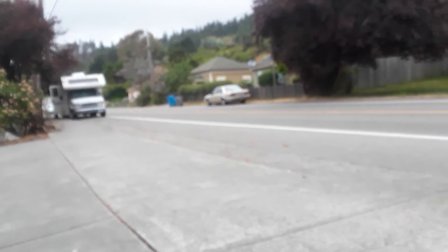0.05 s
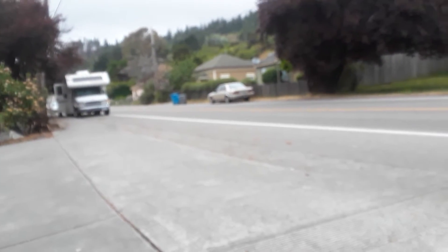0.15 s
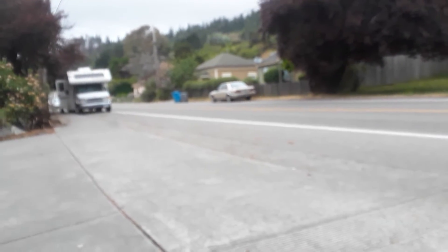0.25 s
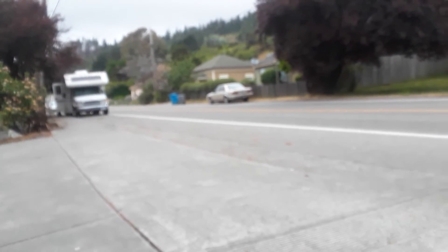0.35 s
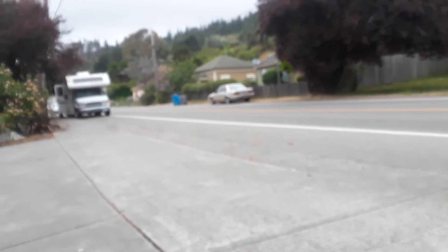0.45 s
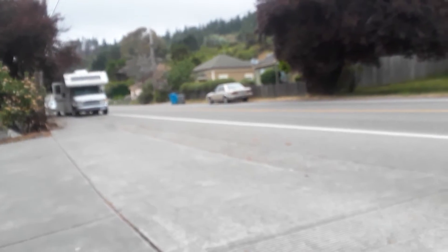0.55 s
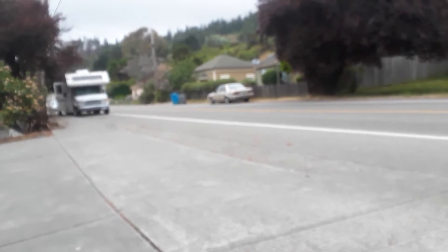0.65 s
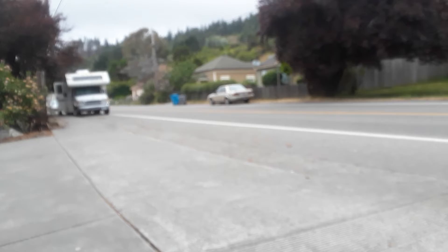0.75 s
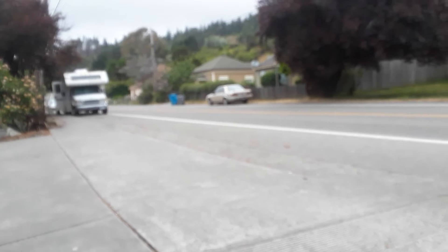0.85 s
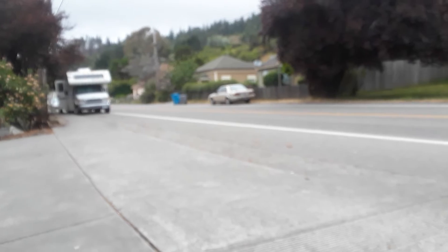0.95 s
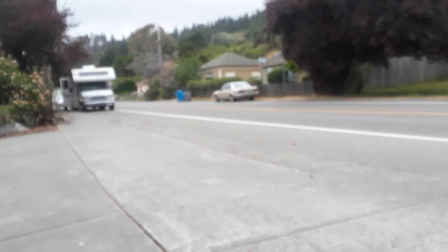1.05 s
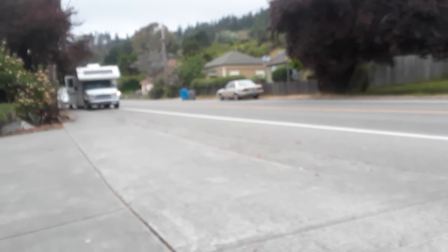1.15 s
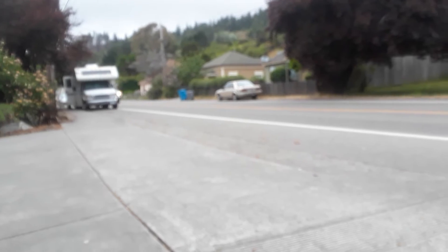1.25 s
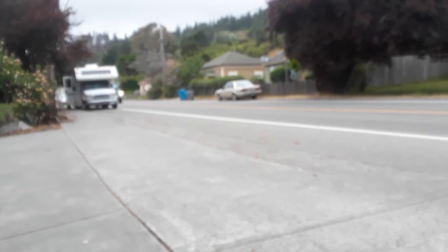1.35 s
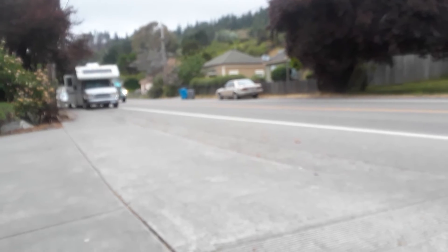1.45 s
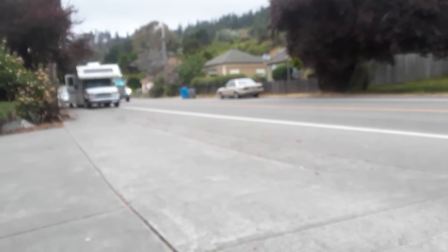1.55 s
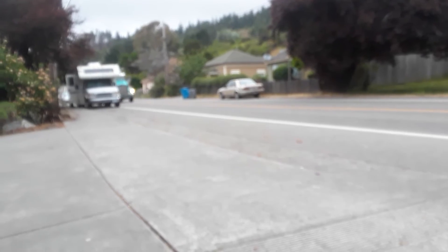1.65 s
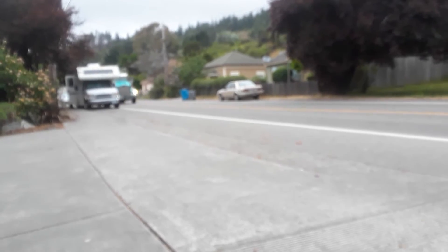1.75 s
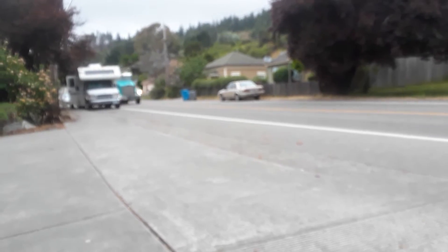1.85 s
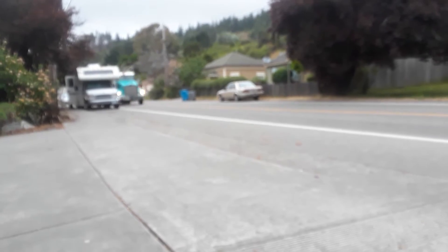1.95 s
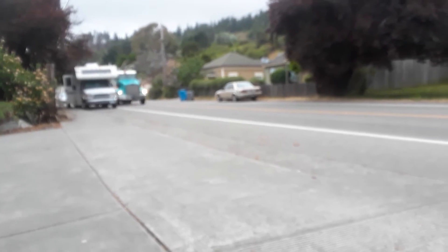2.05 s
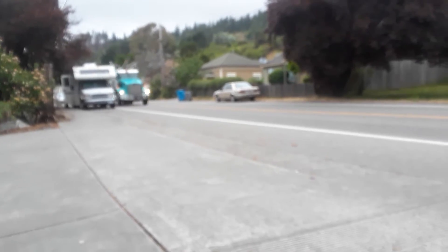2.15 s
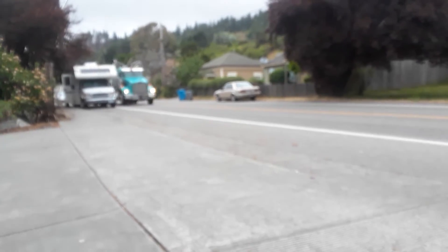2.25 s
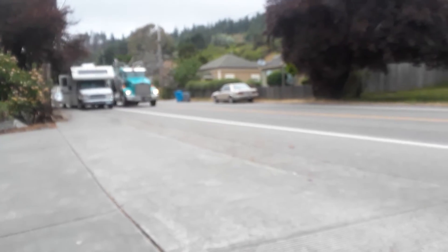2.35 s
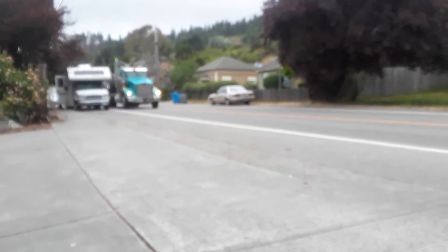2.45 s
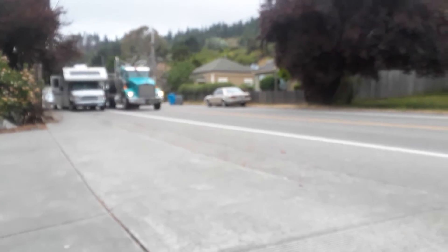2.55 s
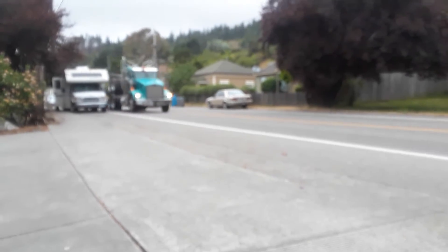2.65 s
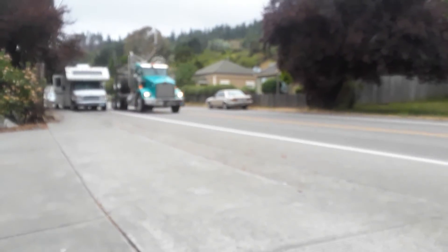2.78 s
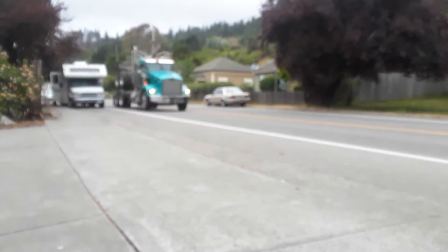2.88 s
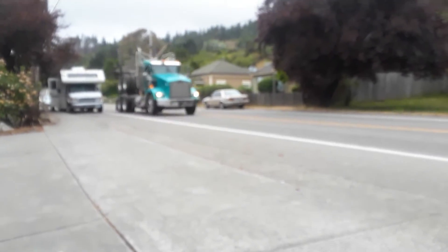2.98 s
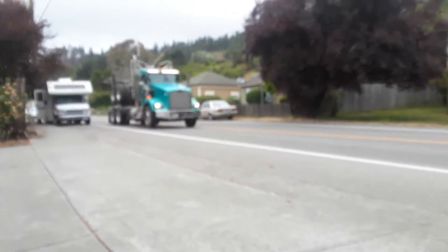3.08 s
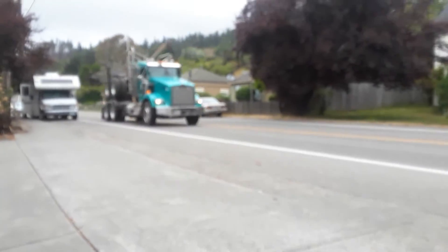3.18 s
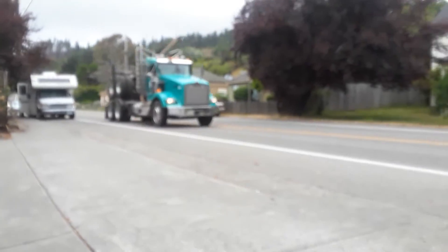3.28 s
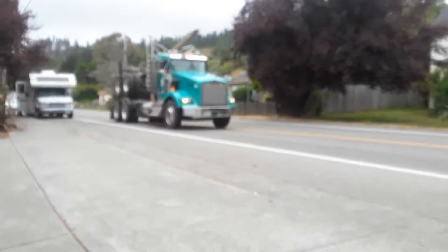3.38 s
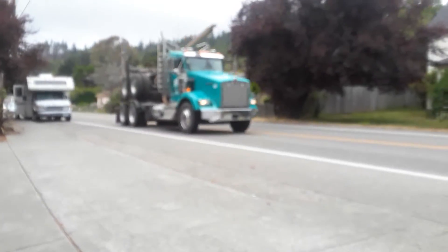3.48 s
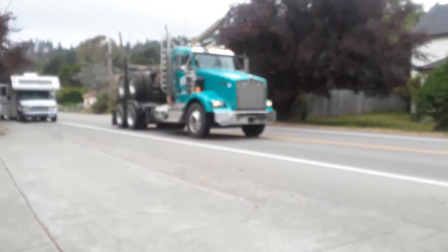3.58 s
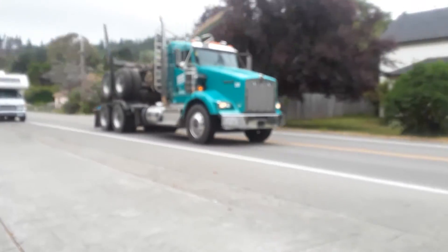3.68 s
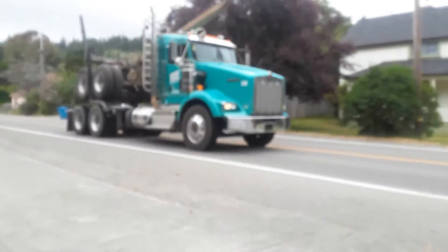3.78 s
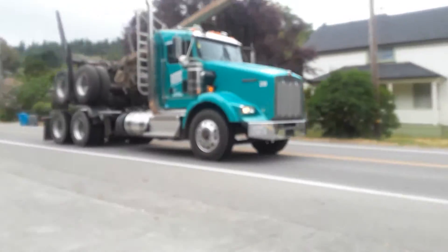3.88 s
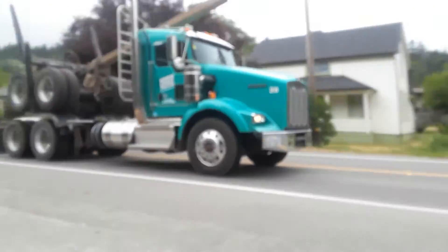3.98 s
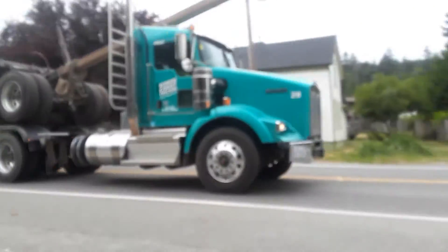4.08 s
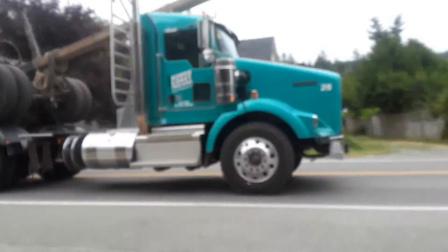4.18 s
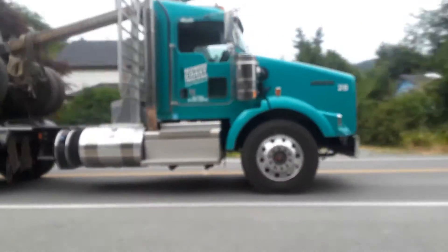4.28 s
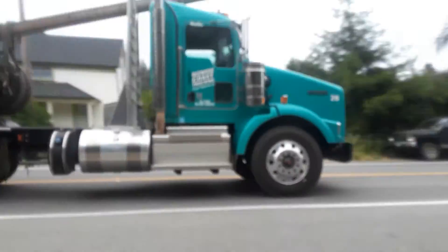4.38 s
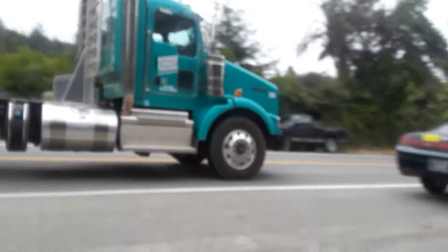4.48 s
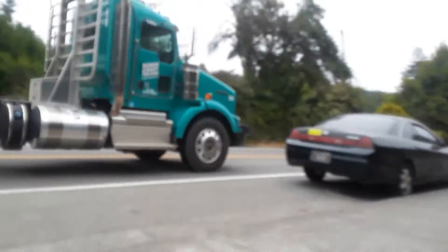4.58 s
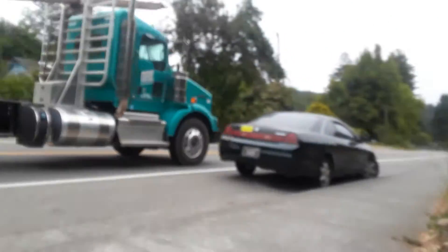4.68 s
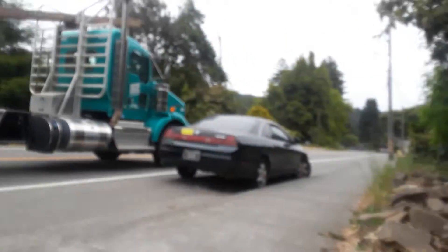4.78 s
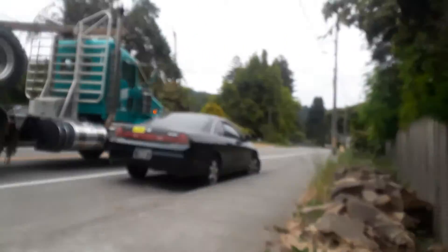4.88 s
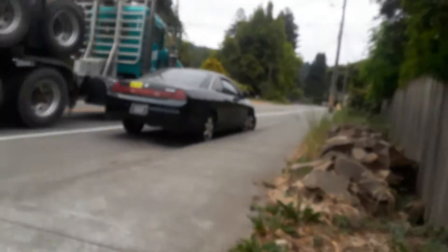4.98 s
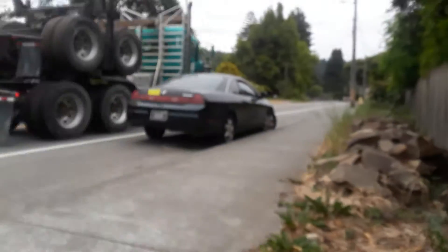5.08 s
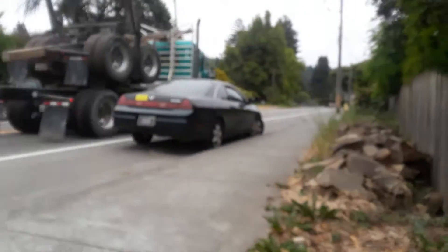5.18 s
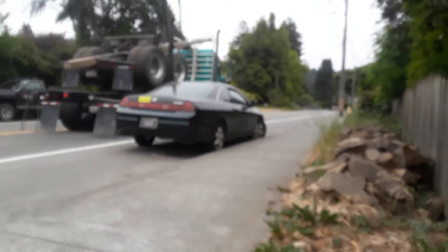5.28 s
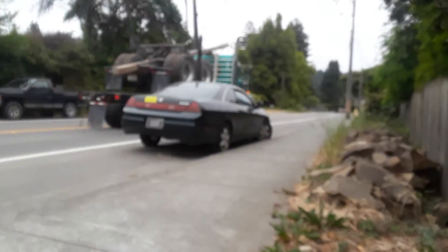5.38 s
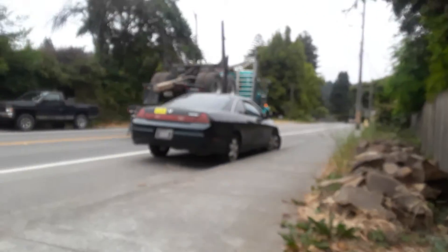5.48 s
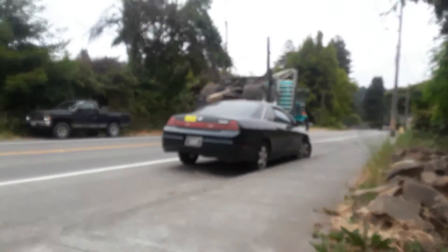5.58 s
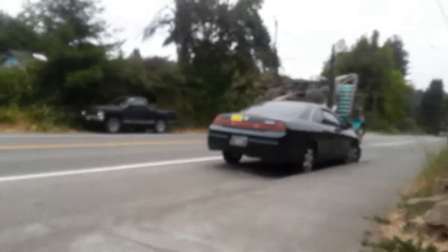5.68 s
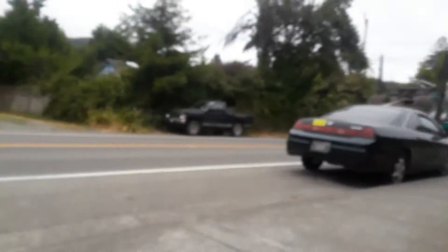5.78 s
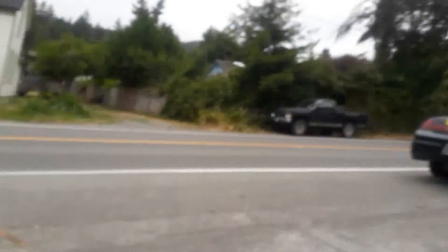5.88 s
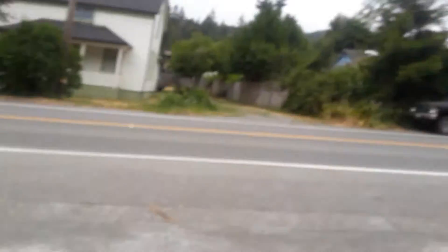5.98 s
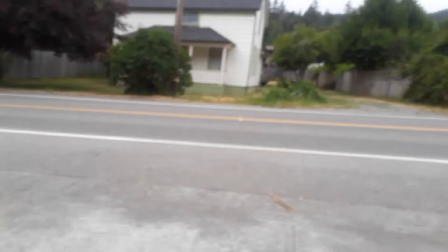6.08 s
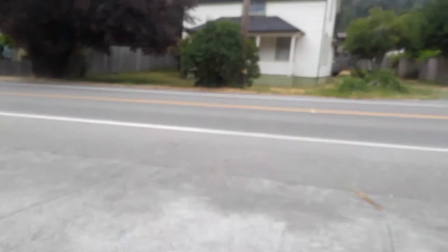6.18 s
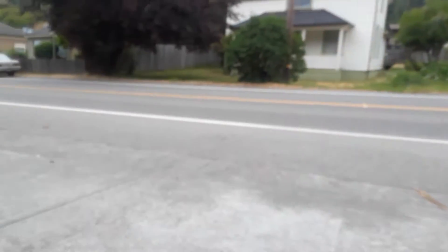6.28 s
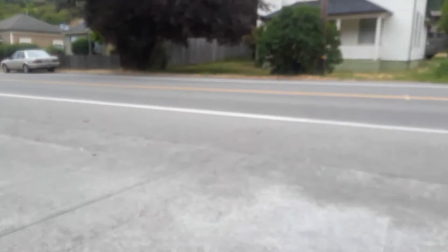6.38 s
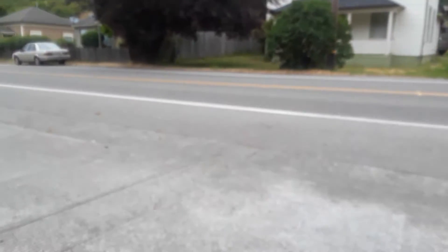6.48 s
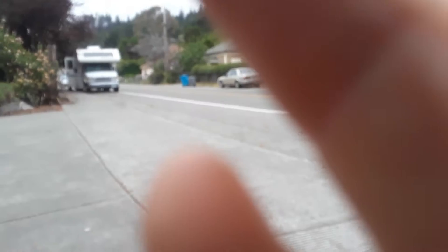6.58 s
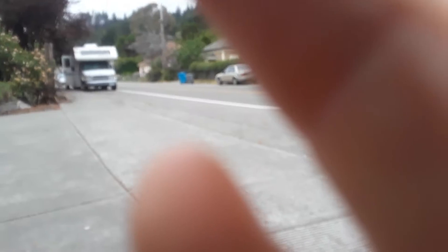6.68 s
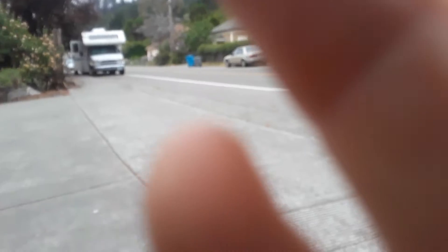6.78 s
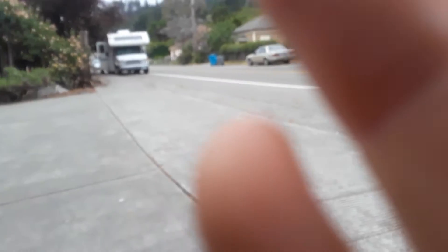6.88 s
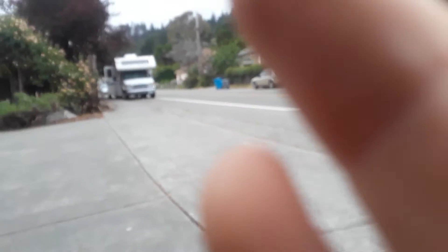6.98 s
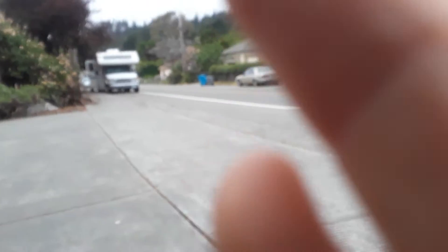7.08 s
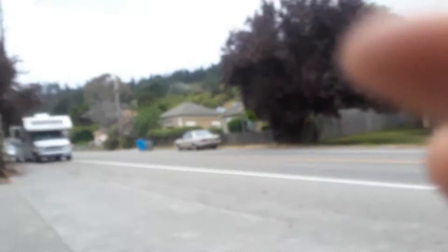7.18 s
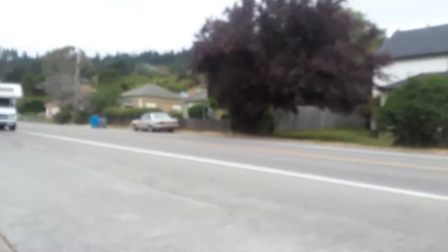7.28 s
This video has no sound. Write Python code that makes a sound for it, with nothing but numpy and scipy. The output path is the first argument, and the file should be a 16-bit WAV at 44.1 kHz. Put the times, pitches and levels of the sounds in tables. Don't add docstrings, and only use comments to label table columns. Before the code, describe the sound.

Droning truck engine swells from faint to a loud roadside pass, recedes, then stops dead; soft traffic hum, bird chatter and handling knocks follow.

```python
import sys
import numpy as np
from scipy import signal
from scipy.fft import rfft, irfft, next_fast_len
from scipy.io import wavfile
from scipy.ndimage import uniform_filter1d

SR = 44100
rng = np.random.default_rng(int(sys.argv[2]) if len(sys.argv) > 2 else 0)


def wav_record(signal):
    frames = np.transpose(np.atleast_2d(signal))
    bounded = np.clip(frames, -1, 1)
    quanta = np.round(bounded * 32767).astype(np.int16)
    wavfile.write(sys.argv[1], SR, quanta)


def volts_from_db(level):
    exponent = np.asarray(level, float) / 20
    return 10 ** exponent


N = 323694
TIME = np.arange(N) / SR
SCENE_CHANGE_S = 6.581


def curves(table):
    s, *columns = np.transpose(table)
    return [np.interp(TIME, s, column) for column in columns]


def at(table, hz):
    table_hz, value = np.transpose(table)
    return np.interp(np.log(hz), np.log(table_hz), value)


def bumps(table):
    return sum(db * np.exp(-((TIME - s) / width) ** 2) for s, db, width in table)


def unit(x):
    return x / np.sqrt(np.mean(x ** 2))


def band(x, hz, width):
    return signal.lfilter(*signal.iirpeak(min(hz, .45 * SR), hz / width, fs=SR), x)


def steep_band(x, hz, width):
    return band(band(x, hz, width), hz, width)


def walk(rate, size=N):
    hold = int(SR / rate)
    steps = np.repeat(rng.standard_normal(size // hold + 1), hold)
    return 1.469 * uniform_filter1d(uniform_filter1d(steps, hold), hold)[:size]


def smeared(phase, rate):
    return walk(rate, size=len(phase)) * np.sin(phase) + walk(rate, size=len(phase)) * np.cos(phase)


def gliding_phase(hz):
    return 2 * np.pi * np.cumsum(hz) / SR


def add(out, x, s):
    i = int(s * SR)
    out[..., i:i + x.shape[-1]] += x[..., :N - i]


def facing(level_db, front_db, near_db, behind_db, kept, far_db):
    speed_m_s, passes_s, kerb_m, closest_db = 10.9, 4.387, 4.77, -23.5
    along = speed_m_s * (TIME - passes_s)
    metres = np.hypot(along, kerb_m)
    behind = (1 + along / metres) / 2
    db = front_db + near_db * kerb_m / metres + behind * (behind_db + kept * (closest_db - level_db))
    return 10 * np.log10(volts_from_db(2 * db) + volts_from_db(2 * (far_db - level_db)))


# time in seconds, samples the left leads, left minus right in dB.
PORT_LEAD = [(0, 4.5, 0), (3.3, 5, 0), (3.8, 4, 0), (4.3, 8, 0), (4.8, 13, 0), (5.3, 8, 0), (5.75, -2, -.6),
             (6.1, -14, -2), (6.57, -17, -2), (6.6, 6, 0)]


def ports(common, reach=1):
    lead, pan_db = curves(PORT_LEAD)
    left = np.interp(np.arange(N) + reach * lead, np.arange(N), common)
    return np.array([volts_from_db(pan_db / 2) * left, volts_from_db(-pan_db / 2) * common])


# frequency in Hz, share common to both (0 to 1).
PORTS_ALIKE = [(30, 0.91), (60, 0.86), (110, 1), (250, 0.8), (550, 0.96), (1200, 0.73), (2200, 0.41),
               (4200, 0.3), (9000, .05)]
# frequency in Hz, left minus right in dB.
LEFT_FAVOUR = [(600, 0), (1700, 4.5), (4200, 6.5), (8000, -2.5), (12000, -7.5)]
# time in seconds, common share lost (0 to 1), half width in seconds.
FROM_ALL_SIDES = [
    (.8, .25, 0.54),
    (4.45, .45, 0.24),
    (5.9, .4, .35),
]


def noise_bands(colour, db_of, flicker_db):
    bass, treble, own = 0, 0, 0
    for hz in 32 * 2 ** (np.arange(28) / 3):
        gain = volts_from_db(db_of(hz) + 10 * np.log10(hz) + flicker_db * walk(12))
        shared, *separate = (unit(steep_band(v, hz, hz / 3)) for v in rng.standard_normal((3, N)))
        alike = np.clip(at(PORTS_ALIKE, hz) * (1 - bumps(FROM_ALL_SIDES) * min(hz / 1000, 1)), 0, 1)
        side = volts_from_db(np.array([[.5], [-.5]]) * at(LEFT_FAVOUR, hz))
        common = side * gain * np.sqrt(alike) * shared
        if hz > 1700:
            treble = treble + common
        else:
            bass = bass + common
        own = own + side * gain * np.sqrt(1 - alike) * np.array(separate)
    flat = own
    for common, reach in ((bass, 1), (treble, .35)):
        flat = flat + np.array([ports(common[0], reach)[0], ports(common[1], reach)[1]])
    size = next_fast_len(N + SR)
    hz = np.arange(1, size // 2 + 2) * SR / size
    return irfft(rfft(flat, size) * volts_from_db(at(colour, hz)), size)[:, :N]


# time in seconds, level in dB.
STACK_DB = [(0.0, -28.5), (0.8, -24.5), (.98, -23.5), (1.25, -26.5), (1.5, -22.5), (1.7, -24), (2.1, -19.5),
            (2.5, -15), (3.05, -14), (3.4, -10), (4.0, -6.5), (4.6, -6.5), (5.05, -14.5), (5.45, -6),
            (6.3, -10.5), (6.58, -14.5)]
# time in seconds, depth in dB, half width in seconds.
ECHO_FADES = [(.02, -7, 0.033), (.185, -6, .03), (.29, -10, 0.012), (.425, -13, .04), (.472, -12, 0.013),
              (.515, -18, 0.051), (.615, -19, 0.019), (.7, -28, 0.023), (.76, -5, 0.018), (.86, -8, .015),
              (.91, -4, .03), (1.003, -14, 0.0088), (1.08, -11.5, 0.043), (1.125, -15, 0.011),
              (1.195, -12, 0.025), (1.235, -25, 0.016), (1.35, -16, 0.045), (1.41, -14, 0.0081),
              (1.513, -27, 0.019), (1.67, -19, 0.02), (1.8, -3, 0.027), (2.22, -9, 0.052),
              (2.34, -7.5, 0.064), (2.63, -9, 0.028), (2.74, -8, 0.044), (2.82, -5, 0.061),
              (2.97, -1, 0.026), (3.105, -13, 0.03), (3.18, -10, 0.012), (3.245, -15, 0.052),
              (3.312, -22, 0.0099), (3.352, -16, 0.025), (3.527, -8.5, 0.029), (3.653, -3.5, 0.027),
              (3.895, -5, 0.042), (4.045, -20, 0.018), (4.092, -19.5, 0.016), (4.16, -6, 0.12),
              (4.225, -5, 0.012), (4.4, -6, 0.067), (4.5, -7.5, 0.043), (4.714, -6.5, 0.019),
              (4.9, -6.5, 0.024), (4.975, -21, 0.016), (5.09, -1.5, 0.032), (5.18, -12, 0.032),
              (5.23, -11, 0.027), (5.35, -4.5, 0.045), (5.575, -6.5, 0.039), (5.755, -11.5, 0.051),
              (6.07, -7.5, 0.047), (6.13, -3.5, 0.061)]


def exhaust_stack(shaft, smear_db):
    tone = np.sin(6 * shaft) + volts_from_db(smear_db) * smeared(6 * shaft, 30)
    tone = tone / np.sqrt(1 + 2 * volts_from_db(2 * smear_db))
    level_db = curves(STACK_DB)[0] + bumps(ECHO_FADES)
    return ports(np.sqrt(2) * volts_from_db(level_db) * tone, reach=1.4)


# time in seconds, frequency in Hz.
SEVENTH_PITCH = [(0, 199.2), (1.5, 200.8), (2.2, 203.9), (2.8, 201), (4.1, 203.4), (4.6, 196.6),
                 (5.3, 192.2), (6.6, 191.9)]
# time in seconds, change in dB, half width in seconds.
SEVENTH_PLACES = [(.5, 12.5, 0.72), (1.0, 8, 0.06), (1.55, 12.5, 0.065), (1.78, -10, 0.086),
                  (2.15, 3.5, 0.51), (2.63, 4, 0.069), (3.7, -8, 0.14), (4.04, 9, 0.1), (4.28, 7, 0.17),
                  (4.5, -10, .04), (4.83, 16.5, 0.0099), (5.03, 1, 0.031), (5.31, 4, .04)]


def seventh_order(smear_db):
    level_db = curves(ROAR_LEVEL)[0] - 9.5 + bumps(SEVENTH_PLACES)
    phase = gliding_phase(curves(SEVENTH_PITCH)[0])
    tone = np.sin(phase) + volts_from_db(smear_db + 5) * smeared(phase, 25)
    return ports(np.sqrt(2) * volts_from_db(level_db - 3) * tone, reach=1.4)


# multiple of the shaft rate, level in dB against the stack tone.
OTHER_ORDERS = [(2, -33.5), (3, -35), (4, -35.5), (12, -31)]


def other_orders(shaft):
    level_db = curves(STACK_DB)[0] + bumps(ECHO_FADES)
    mean_db = uniform_filter1d(level_db, SR // 2)
    orders = sum(volts_from_db(db + 0.99 * mean_db - 2.0 + 2.0 * walk(3.9)) * np.sin(k * shaft) for k, db in OTHER_ORDERS)
    return ports(np.sqrt(2) * orders, reach=3.0)


# multiple of the shaft rate, level in dB against the roar.
CLATTER = [(15, -12.5), (18, -11.5), (21, -11), (24, -27), (31, -33.5), (44, -15.5), (50, -23), (66, -36),
           (71, -23.5)]
CLATTER_VIEWS = {21: [(2.15, 5.5, 0.23), (3.65, 4, 0.11), (4.1, -6.5, 0.2)], 24: [(4.95, 4, 0.12)],
                 31: [(4.9, 8, .15)], 18: [(3.6, -5.5, .3), (4.7, 3, 0.093), (2.4, -8.5, .15),
                 (4.2, 1.5, .15)], 44: [(.6, -11, 0.56), (2.6, -3, 0.16), (3.75, 7, 0.25)],
                 50: [(3.8, 10, 0.37)], 66: [(4.45, 17.5, .25)], 71: [(3.9, 10.5, 0.51)]}
# dB from the front, dB gained alongside, dB gained from behind,
# dB kept per dB lost going away, far traffic in dB.
BLOCK_FACING = (0, 4, -9, 0, -69)
# multiple of the shaft rate, level in dB against that band.
DRONE_ORDERS = [(11, -4.5), (12, -1.5)]


def block_clatter(shaft):
    level_db, = curves(ROAR_LEVEL)
    block_db = level_db + facing(level_db, *BLOCK_FACING)
    drone_db = facing(level_db, *DRONE_FACING)
    out = np.zeros(N)
    for k, db in CLATTER:
        swell_db = bumps(CLATTER_VIEWS.get(k, [])) + 0.64 * walk(4)
        out += volts_from_db(db + block_db + swell_db) * smeared(k * shaft, k * (3.5 + k / 30))
    for k, db in DRONE_ORDERS:
        out += volts_from_db(db + level_db + 1.39 * drone_db) * smeared(k * shaft, 2.5 * k)
    return ports(out)


# time in seconds, frequency in Hz, level in dB.
TURBO_WHISTLE = [(0, 9400, -120), (3.4, 9350, -78), (3.75, 9250, -63), (4.1, 9050, -56), (4.5, 8800, -56),
                 (5.05, 8450, -61), (5.4, 8350, -72.5), (6.6, 8250, -78.5)]


def turbo():
    hz, db = curves(TURBO_WHISTLE)
    return ports(volts_from_db(db + 2.5 * walk(10)) * smeared(gliding_phase(hz), 500))


# time in seconds, stack tone in Hz, smear by scattered echoes in dB.
ENGINE_PITCH = [(0, 172.9, -18), (.5, 174.3, -8.5), (.85, 173.3, -12), (.98, 180.2, -7.5),
                (1.45, 179.8, -5.5), (1.6, 171.9, -14), (2.7, 173.7, -11.5), (3, 175.1, -14),
                (3.4, 175.9, -20), (3.75, 175.3, -13), (4, 176.4, -18), (4.3, 175, -18),
                (4.65, 173.2, -18.5), (4.85, 168.8, -11.5), (5.1, 170.9, -23.5), (5.3, 164.7, -24),
                (5.8, 166.3, -18), (6.56, 165.2, -23.5)]


def engine():
    hz, smear_db = curves(ENGINE_PITCH)
    shaft = gliding_phase(hz * (1 + .005 * walk(10))) / 6
    tones = exhaust_stack(shaft, smear_db) + seventh_order(smear_db) + other_orders(shaft)
    return tones + block_clatter(shaft) + turbo()


# time in seconds, frequency in Hz, level in dB.
REAR_HOWL = [(0, 440, -81), (4.75, 442, -70), (4.9, 434, -34), (5.3, 414.9, -35.5), (5.62, 395, -38.5),
             (5.8, 390, -70), (6.6, 390.4, -80)]
# time in seconds, frequency in Hz, level in dB.
BENT_HOWL = [(0, 650, -80), (4.3, 650, -60), (4.45, 640, -34), (4.76, 585, -31), (4.9, 635, -32),
             (5.17, 745, -34), (5.3, 760, -70), (6.6, 760, -80)]


def tyre_howl():
    howls = [curves(REAR_HOWL), curves(BENT_HOWL)]
    return ports(sum(volts_from_db(db) * smeared(gliding_phase(hz), 45) for hz, db in howls))


# time in seconds, level in dB.
ROAR_LEVEL = [(0, -44.5), (.15, -45), (.6, -42.5), (1.0, -38), (1.5, -33.5), (1.85, -31.5), (2.1, -27.5),
              (2.8, -23), (3.1, -21.5), (3.6, -20), (4.4, -18), (4.7, -18.5), (5.2, -21), (5.5, -29.5),
              (6.0, -31), (6.58, -33.5)]
# frequency in Hz, level in dB per Hz.
ROAR_SPECTRUM = [(30, -33), (55, -29), (110, -5), (300, -2), (375, -2), (560, -3), (1400, -7.5),
                 (1650, -11.5), (2200, -12), (3100, -22.5), (3800, -19), (5300, -28), (8000, -38),
                 (9300, -56)]
# dB from the front, dB gained alongside,
# dB gained from behind, dB kept per dB lost going away, far traffic in dB.
RUMBLE_FACING = (-15.5, 9, -3, 0.7, -46)
DRONE_FACING = (-16, 5, 8.5, 0, -44.5)
TREBLE_FACING = (-15.5, 10, -8.5, 0.93, -64.5)
# time in seconds, rumble change in dB, half width in seconds.
ROAD_SEAMS = [(1.38, -1.5, 0.063), (3.7, -4.5, 0.22), (3.35, 4.5, 0.063), (.08, -10, .08), (.55, 3, 0.084),
              (2.97, -3.5, .05), (4.62, -4, 0.045), (4.8, 2.5, 0.11), (.85, 7, 0.13), (2.12, -10.5, 0.099),
              (2.38, 4.5, 0.049), (2.78, -3.5, 0.062), (3.15, 2, .1), (4.3, 0, .08), (5.0, 10, 0.076),
              (5.6, 11, 0.04), (5.95, 14, 0.15)]
# time in seconds, change in dB, half width in seconds.
AXLE_HISS = [
    (2.3, -1, .2),
    (3.55, 0, 0.22),
    (4.8, 3, 0.45),
    (5.3, -3.5, 0.17),
]


def roar():
    level_db, = curves(ROAR_LEVEL)
    rumble_db = facing(level_db, *RUMBLE_FACING) + 1.5 * walk(7.2) + bumps(ROAD_SEAMS)
    drone_db = facing(level_db, *DRONE_FACING)
    shade_db, clear_s, clearing_s = -3.5, 2.97, 0.055
    treble_db = facing(level_db, *TREBLE_FACING) + bumps(AXLE_HISS)
    treble_db = treble_db + shade_db / (1 + np.exp((TIME - clear_s) / clearing_s))
    swell = .3 * walk(12) + 1.0 * walk(90)

    def db_of(hz):
        low = at([(140, 0.85), (230, 0.021)], hz) * (rumble_db + 14.5)
        drone = at([(140, 0.065), (230, 0.67), (400, 0.72), (500, 0.11)], hz) * (drone_db + 4.5)
        high = at([(1300, 0.047), (2800, 0.75), (8000, 0.59)], hz) * (treble_db + 10.5)
        return level_db - 31.0 + low + drone + high + swell

    air = np.array([unit(steep_band(v, 12500, 7000)) for v in rng.standard_normal((2, N))])
    air_db = -52 + 0.97 * (level_db + treble_db + 30.0) + bumps([(4.4, 4.5, 0.76)])
    return noise_bands(ROAR_SPECTRUM, db_of, flicker_db=1.0) + air * volts_from_db(air_db)


# time in seconds, share cancelled by the reflection (0 to 1).
ROAD_BOUNCE = [(0, 0.88), (1.3, 0.64), (2.4, 0.71), (3.2, 0.03), (6.6, 0.024)]


def road_bounce(truck):
    return truck - np.clip(curves(ROAD_BOUNCE)[0], 0, 1) * band(truck, 354, 81)


# time in seconds, peak in dB, upper modes in dB, left minus right in dB, ring in dB.
BUCKLE_TICKS = [(0.6025, -53, -20, 3, -24), (0.7287, -35, -16.5, -1, -37), (0.7797, -40, -21, -5, -24),
                (0.8587, -33, -16, -7, -37), (0.8764, -55, -14, 1, -41), (0.8955, -31, -8, -3, -30),
                (0.9035, -32.5, -21, 1, -54), (1.0656, -40, -13, -6, -33), (1.0742, -25.5, -16, -9, -20),
                (1.082, -38, -8, -6, -27), (1.091, -50, -13, -4, -28), (1.047, -60, -12, -5, -30),
                (1.058, -53, -12, -1, -28), (1.1348, -55, -10, 6, -30), (1.2774, -51, -21, 9, -30),
                (1.3114, -53, -21, 2, -28), (1.4844, -63, -23, 3, -28), (1.695, -50, -19, 8.5, -31),
                (1.7705, -46, 5, -6, -24), (1.7747, -41.5, 7, -8, -17), (1.838, -38.5, -6, -8, -19),
                (1.9072, -49, 10, -3, -37), (1.9333, -33, 7, -10, -11), (1.947, -31.5, -0.5, -7.5, -26),
                (1.9498, -25, 4, -6, -8), (1.9714, -34.5, -11, -9, -20), (1.9806, -48, -18, 1.5, -25),
                (2.0776, -42, 3, -3, -21)]
# frequency in Hz, level in dB, time to die by 60 dB in seconds.
LOW_MODES = [(5220, 3.5, 0.0067), (6300, -3, 0.007), (8200, 4.5, 0.031), (7800, 3.5, .025)]
HIGH_MODES = [(10100, 4.5, 0.032), (11300, -10, .01), (13880, 13.5, 0.02), (14970, 11.5, .015)]


def buckle():
    out, t = np.zeros((2, N)), np.arange(SR // 12) / SR
    lowpart = signal.butter(3, (4400, 9500), "band", fs=SR, output="sos")
    for s, db, high_db, pan_db, ring_db in BUCKLE_TICKS:
        decay = 2.2 * np.exp(-t / 0.00036) + np.exp(-t / 0.0029) + 0.11 * np.exp(-t / 0.0053)
        rattle = rng.standard_normal(len(t)) * decay
        tick = signal.sosfilt(lowpart, rattle) + volts_from_db(high_db + 11.5) * steep_band(rattle, 12700, 9000)
        for modes, gain in ((LOW_MODES, 1), (HIGH_MODES, volts_from_db(high_db))):
            for hz, mode_db, t60 in modes:
                louder, sharper = rng.standard_normal(2)
                ring = np.exp(-np.log(1000) * t / t60) * np.sin(2 * np.pi * hz * (1 + 0.0052 * sharper) * t)
                ring = signal.fftconvolve(rattle, ring)[:len(t)]
                tick = tick + gain * volts_from_db(mode_db + 2.0 * louder + ring_db) * ring
        side_db = np.array([[.5], [-.5]]) * np.clip(pan_db - 6.0, -12, 0)
        add(out, tick / np.abs(tick).max() * volts_from_db(db + 3.5 + side_db), s)
    return out


# time in seconds, peak in dB, ring in Hz, cycles of ring, port (0 left, 1 right).
FINGER_TAPS = [(6.182, -20, 900, 1.5, 1), (6.188, -18, 2740, 4.9, 1), (6.5135, -26, 900, 1.5, 0),
               (6.5218, -18.5, 5230, 1.28, 0), (6.725, -17, 1700, 0.63, 0), (6.809, -6.5, 2800, 0.83, 0),
               (6.847, -13.5, 3000, 0.44, 1), (6.879, -29, 2210, 1.2, 1), (6.85, -26, 900, 1, 0),
               (7.013, -31, 1500, 1, 0), (7.245, -22, 2000, 1, 0), (7.288, -15, 2000, 1, 0),
               (7.112, -14, 467, 0.7, 0), (7.1654, -8, 2400, 1.7, 1), (7.174, -10, 2600, .8, 1),
               (7.304, -45, 7000, 1.2, 1)]
# time in seconds, peak in dB, push in seconds, port (0 left, 1 right).
NAIL_KNOCKS = [
    (6.1833, -1, .00032, 1),
    (6.5136, -10, .0004, 0),
]


def finger_taps():
    out, t = np.zeros((2, N)), np.arange(SR // 50) / SR
    for s, db, hz, cycles, port in FINGER_TAPS:
        ring = np.exp(-t * hz / cycles) * np.sin(2 * np.pi * hz * t)
        click = .8 * ring / ring.max() + 0.05 * rng.standard_normal(len(t)) * np.exp(-t / 0.0004)
        thud = 0.056 * np.exp(-t / 0.0039) * np.sin(2 * np.pi * 550 * t)
        add(out[port], -volts_from_db(db + 4.5) * (click + thud), s)
    for s, db, push_s, port in NAIL_KNOCKS:
        add(out[port], -volts_from_db(db) * np.hanning(int(push_s * SR)), s)
    return out


# start in seconds, length in seconds, level in dB,
# treble in dB, fade in dB over the length.
LEFT_RUBS = [(2.797, 0.1, -29, -8, -14), (4.83, 0.046, -37, -6.5, -3), (5.19, .03, -42, 3, -3.5),
             (6.724, 0.09, -41, -9, 2), (6.81, 0.045, -36, -30, -6), (6.875, 0.075, -24, -22.5, -13.5),
             (6.924, .115, -33.5, -7.5, 0.6), (7.027, 0.11, -44, -17, 9), (7.075, .03, -38, -14, 6),
             (7.095, 0.074, -19, -20, 0), (7.156, 0.093, -48, -13, 2.5), (7.195, 0.026, -33, -12, 3),
             (7.24, .05, -26, -25, -6), (7.27, .06, -27, -24, 2)]
RIGHT_RUBS = [
    (6.182, 0.1, -22.5, -7, -31),
    (6.291, 0.036, -30.5, -14.5, -4),
    (6.841, 0.051, -33, -18, -14),
    (6.87, 0.053, -53, 2, -4),
    (7.066, 0.052, -56, -23, -5),
    (7.095, 0.099, -45.5, -30, 1),
    (7.177, 0.065, -32.5, -9.5, -4.5),
]


def finger_rubs():
    out = np.zeros((2, N))
    grain = volts_from_db(.7 * walk(300)) * rng.standard_normal(N)
    skin = steep_band(grain, 2040, 2700) + 0.11 * steep_band(grain, 3500, 2600)
    skin = signal.sosfilt(signal.butter(4, 8000, fs=SR, output="sos"), skin)
    body = unit(skin + 0.91 * band(band(grain, 420, 330), 310, 300))
    treble = unit(steep_band(grain, 13000, 9900))
    for port, rubs in enumerate((LEFT_RUBS, RIGHT_RUBS)):
        for s, length, db, treble_db, fade_db in rubs:
            i, n = int(s * SR), int(length * SR)
            u = np.arange(n) / SR
            rise_s = .003 if fade_db < -4.5 else .016
            shape = np.minimum(u / rise_s, 1) * np.minimum((length - u) / 0.023, 1)
            shape = shape * volts_from_db(db + fade_db * u / length)
            add(out[port], shape * (body[i:i + n] + volts_from_db(treble_db) * treble[i:i + n]), s)
    return out


# start in seconds, level in dB, extra dB on the later partials.
JAY_CALLS = [
    (6.654, -45, 1),
    (6.8, -49, 1),
    (6.944, -51, 1),
    (7.089, -50, -3),
    (7.236, -53, 1),
]
# seconds into the note, length in seconds, start in Hz, end in Hz, level in dB.
JAY_PARTIALS = [
    (-.004, .034, 2230, 2120, 2),
    (.008, .03, 6100, 5200, -18),
    (.012, .026, 2500, 2950, -4),
    (.034, .02, 2950, 3080, -3),
    (.02, .024, 2250, 2450, -12),
    (.036, .022, 1600, 1510, -9),
    (.03, .026, 4780, 4560, -2),
    (.034, .02, 7650, 7500, -25),
]


def jay():
    out = np.zeros(N)
    for start, note_db, later_db in JAY_CALLS:
        for s, length, start_hz, end_hz, db in JAY_PARTIALS:
            n = int(length * SR)
            phase = gliding_phase(np.linspace(start_hz, end_hz, n))
            raspy = .7 * np.sin(phase) + .75 * smeared(phase, 400)
            add(out, np.hanning(n) * volts_from_db(note_db + 9.5 + db + later_db * (s > 0)) * raspy, start + s)
    t = np.arange(SR // 5) / SR
    houses = rng.standard_normal((2, len(t))) * np.exp(-t / 0.01) * volts_from_db(-29)
    direct = np.array([volts_from_db(4) * out, np.roll(out, 5)])
    return direct + signal.fftconvolve(out[None], houses, axes=1)[:, :N]


# start in seconds, length in seconds, level in dB, centre in Hz.
LEAF_SWISHES = [(0.209, 0.2, -60, 3400), (0.501, 0.92, -52, 2950), (0.85, 0.029, -40, 900),
                (0.863, 0.19, -40, 1950), (0.9, .1, -54, 3600), (1.132, 0.079, -47, 3200),
                (1.1, .13, -43, 3500), (1.376, 0.081, -43, 3100), (1.6, 0.094, -44, 3600),
                (0.5, 1, -58, 2200), (6.035, 0.08, -41, 3600), (5.95, .08, -53, 4000),
                (6.04, 0.054, -52, 6100), (5.75, 0.15, -49.5, 3900), (.9, 0.027, -37, 1300),
                (1.73, .035, -62, 7500)]


def leaves():
    out = np.zeros((2, N))
    for s, length, db, hz in LEAF_SWISHES:
        n = int(length * SR)
        swish = unit(steep_band(rng.standard_normal((2, n)), hz, hz / 2))
        add(out, np.hanning(n) * volts_from_db(db + np.array([[4], [-4]])) * swish, s)
    return out


# start in seconds, length in seconds, left in dB, right in dB.
WIND_GUSTS = [
    (1.9, 0.34, -50, -50),
    (2.6, .3, -46, -48),
    (5.55, 0.69, -35, -45),
    (5.95, 0.37, -34, -42),
]


def wind():
    out = np.zeros((2, N))
    buffet = unit(steep_band(rng.standard_normal((2, N)), 75, 70)) * volts_from_db(2.7 * walk(12))
    for s, length, *db in WIND_GUSTS:
        i, n = int(s * SR), int(length * SR)
        add(out, np.hanning(n) * volts_from_db(np.array(db)[:, None]) * buffet[:, i:i + n], s)
    return out


# frequency in Hz, level in dB per Hz.
STREET_SPECTRUM = [(24, -47), (40, -13.5), (191, -3.5), (495, -12), (621, -9), (833, -11.5), (912, -15.5),
                   (1760, -19), (2770, -27.5), (9000, -50), (11700, -67), (19800, -66)]
# frequency in Hz, level in dB.
FAR_HUMS = [(82, -50.5), (165, -42.5), (207, -41)]


def street():
    far = unit(noise_bands(STREET_SPECTRUM, lambda hz: 0, flicker_db=-0.5)) * volts_from_db(-39.5)
    gain = volts_from_db(-17 * np.clip(1 - (TIME - SCENE_CHANGE_S) / 0.14, 0, 1) ** .5)
    hums = 0
    for hz, db in FAR_HUMS:
        phase = 2 * np.pi * hz * TIME
        hums = hums + volts_from_db(db) * unit(0.72 * np.sin(phase) + smeared(phase, 25))
    return far + gain * hums


def scene():
    truck = road_bounce(engine() + tyre_howl() + roar())
    before = np.clip((SCENE_CHANGE_S - TIME) / 0.0002, 0, 1)
    places = before * truck + (1 - before) * street()
    return places + buckle() + finger_taps() + finger_rubs() + jay() + leaves() + wind()


def low_pass(x):
    return signal.sosfilt(signal.butter(12, 16670, fs=SR, output="sos"), x)


def record(dry):
    hot = np.clip(dry + volts_from_db(-90.5) * rng.standard_normal(dry.shape), -1, 1)
    mix = signal.sosfilt(signal.ellip(8, .3, 45, 15800, fs=SR, output="sos"), hot)
    return low_pass(mix)


dry = scene()
out = record(dry)
wav_record(out)
```